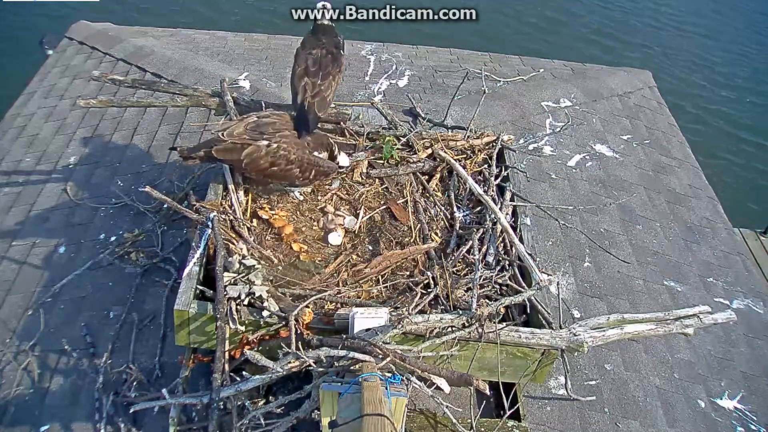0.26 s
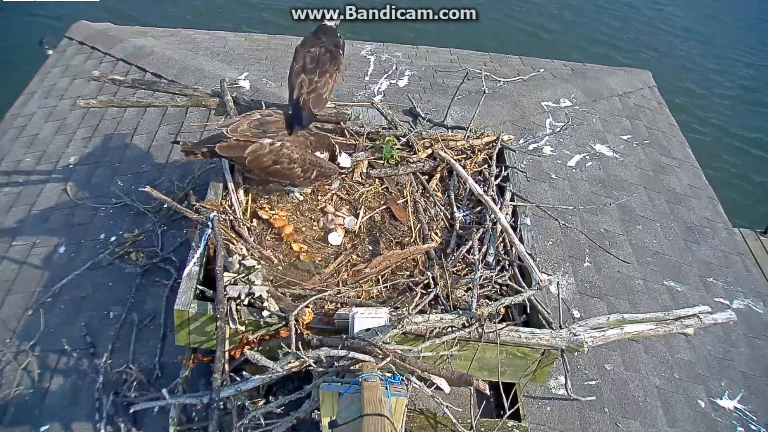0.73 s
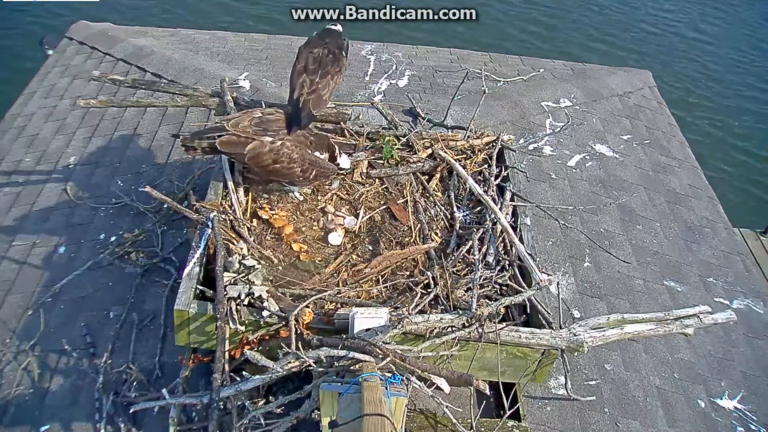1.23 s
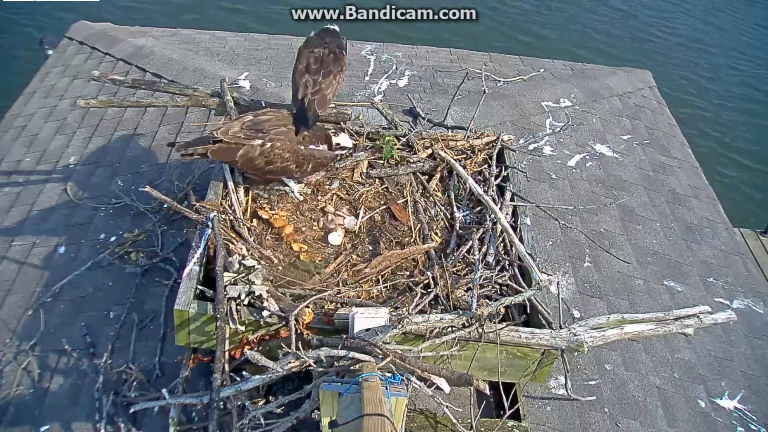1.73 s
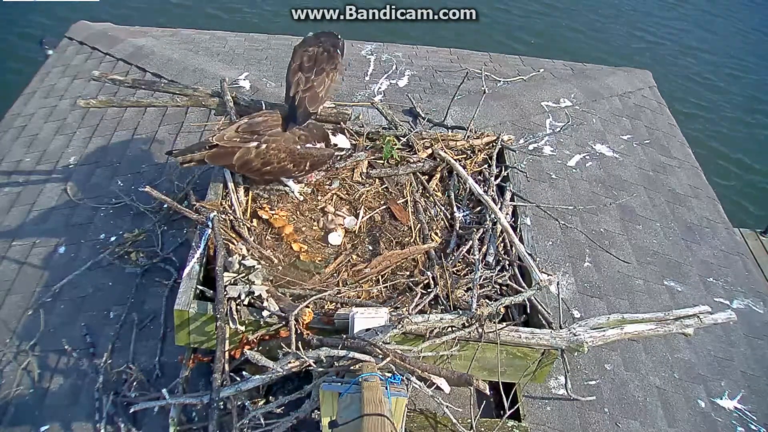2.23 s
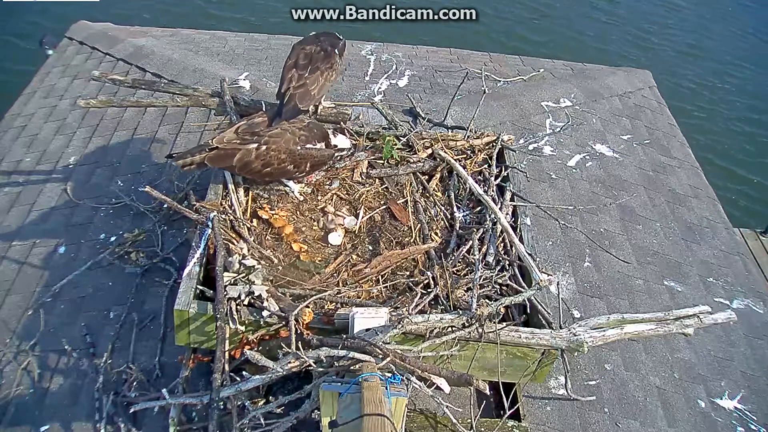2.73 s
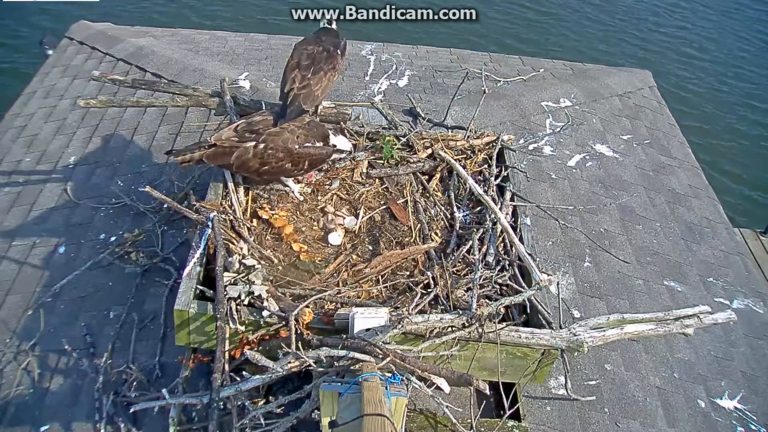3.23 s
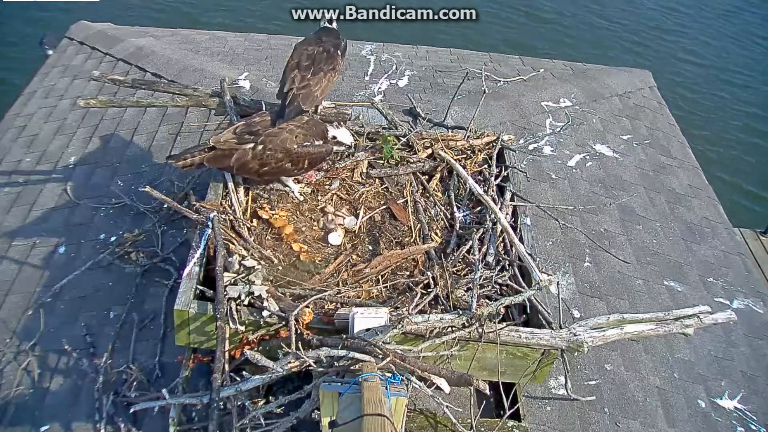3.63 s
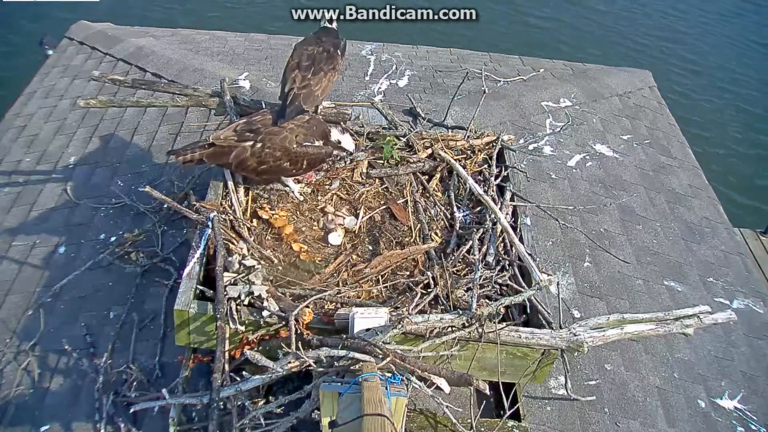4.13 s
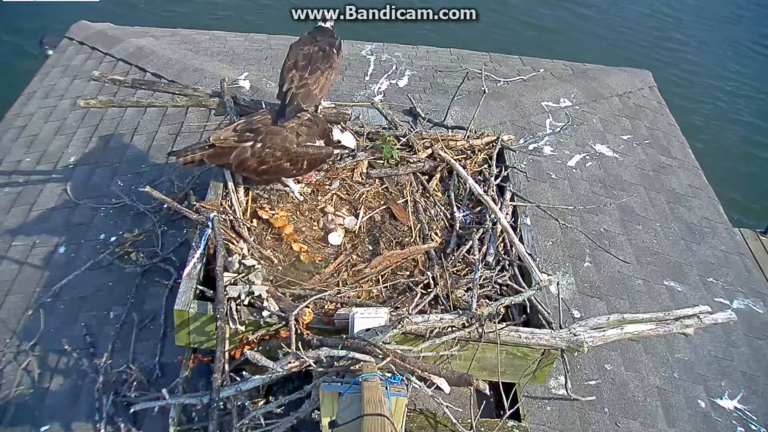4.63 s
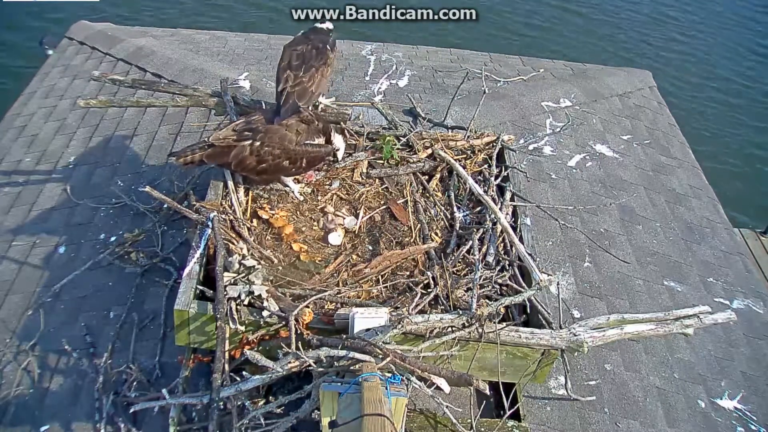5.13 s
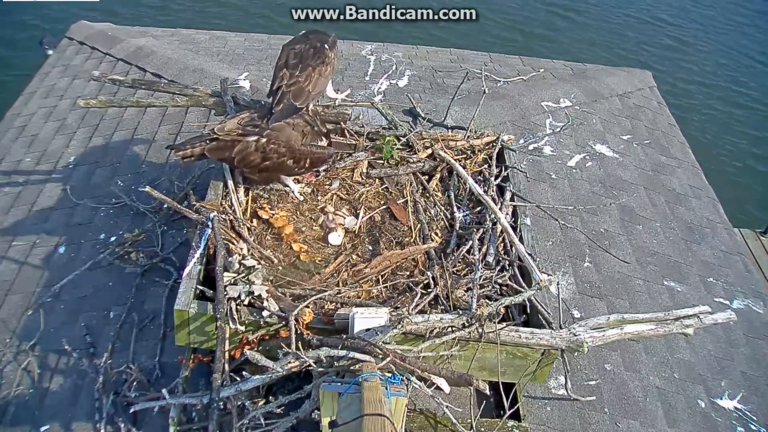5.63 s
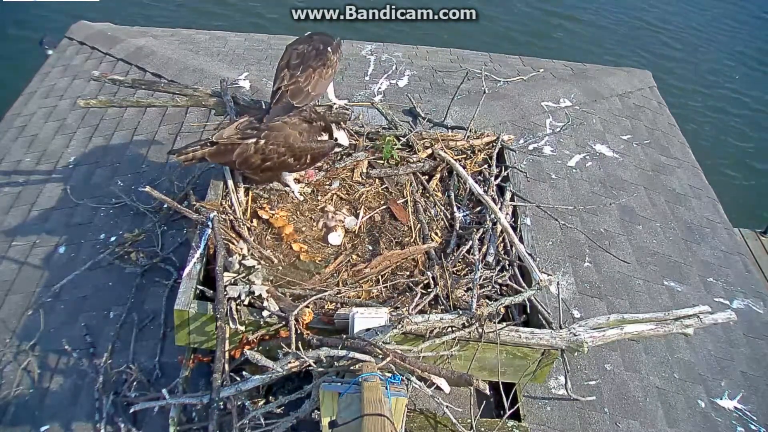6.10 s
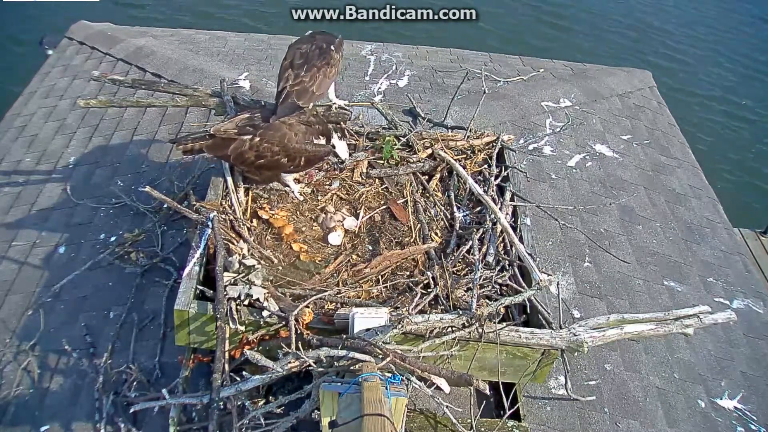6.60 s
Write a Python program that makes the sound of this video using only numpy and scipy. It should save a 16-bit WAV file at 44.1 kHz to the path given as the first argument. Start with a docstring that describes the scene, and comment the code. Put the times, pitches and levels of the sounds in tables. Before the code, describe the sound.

Osprey chicks peep thinly over wind rumbling on the microphone, then an adult gives one loud, ringing chirp.

```python
"""Osprey nest on a waterside roof

Through a small outdoor camera microphone, chicks beg in thin arching peeps that break off in
plunging chips, while twigs tick under the birds' feet. A far songbird whistles a few notes, and
an adult osprey squeaks softly and gives one loud chirp that rings in its throat.
Gusts rumble on the microphone over a low hum, hiss and a faint electronic whine."""
import sys
import numpy as np
from scipy import signal
from scipy.fft import rfft, irfft
from scipy.io import wavfile
from scipy.ndimage import uniform_filter1d

SR = 44100
rng = np.random.default_rng(int(sys.argv[2]) if len(sys.argv) > 2 else 0)


def materialize(psi):
    """Save the field psi as 16-bit PCM at rate SR to the path in sys.argv[1].

    A 1-D psi becomes a single channel; in a 2-D psi each row is a channel.
    """
    bounded = np.clip(np.atleast_2d(psi).T, -1, 1)
    quanta = np.round(bounded * 32767).astype(np.int16)
    wavfile.write(sys.argv[1], SR, quanta)


N = 302495
T = np.arange(N) / SR

# A chick begs about four times a second: an arch of pitch that breaks off in a chip. (break time [s],
# arch top [Hz], break pitch [Hz], arch level [dB], chip drive [dB], open-beak overtones [dB])
BEGGING = [(0.222, 3850, 2820, -48, -56.5, -4), (0.476, 4130, 2964, -48, -46.5, -1),
           (0.712, 3950, 3120, -47, -44, -8), (0.942, 4080, 3690, -56, -42, -8),
           (1.202, 4950, 3847, -68, -41, -14), (1.481, 5450, 4130, -70, -44.5, 0),
           (1.735, 5200, 4120, -64, -41, -0.5), (1.990, 4470, 3915, -61.5, -41.5, -1),
           (2.244, 4600, 4080, -65, -43, 0.5), (2.493, 5500, 3690, -83, -50, -2),
           (2.731, 5500, 3710, -76, -53, -6), (3.268, 4900, 3540, -61, -50, -12),
           (3.521, 5300, 3360, -64, -51, -3), (3.786, 4500, 3530, -66, -64, 0),
           (4.071, 5600, 4130, -65.5, -43.5, -0.5), (4.336, 5500, 3730, -76, -40, -3),
           (4.622, 3780, 2930, -55.5, -49.5, -8), (4.943, 3800, 3040, -52.5, -52, -24)]


def from_db(db):
    """Decibels to gain."""
    return 10 ** (np.asarray(db) / 20)


def rms_one(x):
    """Scale to unit rms."""
    return x / np.sqrt(np.mean(x ** 2) + 1e-20)


def in_time(rows):
    """Each column of a curve at every sample."""
    times, *columns = np.transpose(rows)
    return [np.interp(T, times, column) for column in columns]


def at_hz(spectrum, hz):
    """Gain of a spectrum at given frequencies."""
    points_hz, db = np.transpose(spectrum)
    return from_db(np.interp(np.log(np.maximum(hz, 1)), np.log(points_hz), db))


def noise(spectrum):
    """Unit noise of a given colour, falling away steeply past its ends."""
    hz = np.arange(N // 2 + 1) * SR / N + 1e-3
    roll_off = 1 / (1 + (hz / spectrum[-1][0]) ** 12) / (1 + (spectrum[0][0] / hz) ** 6)
    return rms_one(irfft(rfft(rng.standard_normal(N)) * at_hz(spectrum, hz) * roll_off, N))


def drift(rate_hz):
    """Random wander of unit rms, mostly slower than the given rate."""
    hz = np.arange(N // 2 + 1) * SR / N
    return rms_one(irfft(rfft(rng.standard_normal(N)) / (1 + (hz / rate_hz) ** 4), N))


def phase_of(hz):
    """Running phase of a pitch track."""
    return 2 * np.pi * np.cumsum(hz) / SR


def note(onset, length):
    """Sample indices of a note and its progress from 0 to 1."""
    at = np.arange(int(onset * SR), min(int((onset + length) * SR), N))
    return at, np.clip((at / SR - onset) / length, 0, 1)


def swell(progress, rise, fall):
    """Fade in and out over given shares of a note; between the fades a sine has rms 1."""
    fade_in = np.sin(np.pi / 2 * np.clip(progress / rise, 0, 1))
    fade_out = np.sin(np.pi / 2 * np.clip((1 - progress) / fall, 0, 1))
    return np.sqrt(2) * fade_in * fade_out


def background(drone_db=-47.5, hiss_trim_db=2, whine_trim_db=-1):
    """A bed of low outdoor drone, hiss and the faint whine of the camera's electronics."""
    # noise colours: (frequency [Hz], relative density [dB])
    drone_colour = [(20, -11), (38, -6.5), (60, 4), (90, -4), (125, -9), (170, -23), (215, -24), (270, -33),
                    (330, -26.5), (430, -30.5), (700, -35.5), (1200, -35)]
    hiss_colour = [(590, -29.5), (1000, -16.5), (1030, -24), (1320, -9), (1540, -9), (2050, -7), (2190, -7),
                   (3330, 1), (3620, -2), (4030, -6), (4730, -10), (5180, -10), (6710, -12.5), (7360, -21),
                   (9570, -49.5), (16200, -120)]
    # slight swell of the hiss: (time [s], level before trim [dB])
    hiss_curve = [(0.0, -63), (4.03, -62.5), (4.2, -62.5), (5.46, -62.5), (5.79, -60), (6.86, -63)]
    # electronic tones: (frequency [Hz], level before trim [dB])
    whine_tones = [(1050, -79), (1590, -78.5), (2100, -74.5), (4230, -77.5), (4518, -80.5), (5213, -80.5),
                   (5908, -80), (6603, -82.5)]
    drone = from_db(drone_db) * noise(drone_colour)
    hiss = from_db(in_time(hiss_curve)[0] + hiss_trim_db) * noise(hiss_colour)
    whine = sum(from_db(db + whine_trim_db) * np.sqrt(2) * np.sin(phase_of(hz + 2 * drift(40)))
                for hz, db in whine_tones)
    return drone + hiss + whine


def hum(hz=57.7, db=-46.0, wander=0.02, overtones_db=-13, slope_db=-4):
    """A low, unsteady hum, as of a far engine, with weak overtones that come and go."""
    phase = phase_of(hz * (1 + wander * drift(6.26)))
    out = np.sin(phase) * from_db(2 * drift(7.3))
    for k in range(2, 7):
        level = from_db(overtones_db + slope_db * k + 2 * drift(12))
        out += level * np.sin(k * phase + rng.uniform(0, 2 * np.pi))
    return np.sqrt(2) * from_db(db) * out


def wind_levels(rise_s=.015, fall_s=0.024, breeze_ref_db=-37):
    """Strength of buffeting and of turbulence in dB: the powers of breeze and gusts add up."""
    # breeze between the gusts: (time [s], strength [dB])
    breeze_curve = [(0.0, -40.5), (0.74, -30.5), (0.94, -37), (1.16, -41.5), (1.3, -38.5), (2.73, -61.5),
                    (3.02, -57.5), (3.82, -66.5), (4.3, -50.5), (4.81, -41), (5.25, -53), (5.88, -45.5),
                    (6.42, -26.5), (6.86, -35)]
    # gusts striking the microphone: (time [s], hold [s], buffeting [dB], turbulence before trim [dB])
    gusts = [(0.041, .08, -23.5, -32.5), (0.255, 0.069, -27, -38), (0.491, 0.018, -21, -42),
             (0.64, 0.077, -20, -32), (0.807, 0.024, -24.5, -34), (1.147, 0.069, -31, -44.5),
             (1.363, 0.1, -28, -54), (4.26, 0.094, -25.5, -50.5), (4.667, 0.11, -28, -52),
             (4.838, 0.034, -19, -34), (5.541, 0.022, -34.5, -39), (6.22, 0.082, -18, -31),
             (6.309, 0.072, -16, -26), (6.49, 0.092, -18, -25), (6.689, .16, -20, -31.5)]
    breeze_db = in_time(breeze_curve)[0] - breeze_ref_db
    buffet_power = from_db(-33 + 0.83 * breeze_db) ** 2
    turbulence_power = from_db(-44.5 + 1.56 * breeze_db) ** 2   # grows faster with the breeze
    for onset, hold, buffet_db, turbulence_db in gusts:
        envelope = np.exp(-np.maximum(onset - T, 0) / rise_s - np.maximum(T - onset - hold, 0) / fall_s)
        buffet_power += (from_db(buffet_db) * envelope) ** 2
        turbulence_power += (from_db(turbulence_db) * envelope) ** 2
    return 10 * np.log10(buffet_power), 10 * np.log10(turbulence_power)


def eddies(spectrum, evenness):
    """Low noise of fairly even strength, so that the gusts shape its swells."""
    rumble = noise(spectrum)
    power = uniform_filter1d(rumble ** 2, size=3000) + 1e-6
    return rms_one(rumble / power ** (evenness / 2))


def wind(flutter_trim_db=-1, rush_db=-37, strong_db=-25, steepness=2.01, rough_db=2.0):
    """Big eddies thump the microphone; gusts flutter above them, and only strong ones rush, raggedly."""
    # colours of the wind: (frequency [Hz], relative density [dB])
    buffet_colour = [(18, -7), (28, -4.5), (45, 5), (65, 0), (90, -8), (130, -21), (220, -41.5)]
    turbulence_colour = [(50, -6), (100, 10), (160, -4), (250, -17), (400, -36), (700, -60.5)]
    rush_colour = [(150, 8.5), (250, -0.5), (400, -8.5), (700, -20), (1200, -33), (2400, -41)]
    buffet_db, turbulence_db = wind_levels()
    thumps = from_db(buffet_db) * eddies(buffet_colour, evenness=0.96)
    flutter = from_db(turbulence_db + flutter_trim_db) * eddies(turbulence_colour, evenness=1.0)
    rush_level = from_db(rush_db + steepness * (turbulence_db - strong_db) + rough_db * drift(78))
    return thumps + flutter + rush_level * noise(rush_colour)


def arch(progress, start, top, end, apex):
    """Pitch that rounds up to its top at the apex, then falls ever faster."""
    climb = (top - start) * (1 - progress / apex) ** 2
    fall = (top - end) * ((progress - apex) / (1 - apex)) ** 2
    return top - np.where(progress < apex, climb, fall)


def chick_notes(begging_apex=0.24, edge_ratio=.86, twitters=6, twitter_s=0.09, twitter_db=-66.5):
    """The chicks' phrasing: begging arches, single peeps and faint random twittering."""
    # single, evenly arched peeps: (time [s], length [s], top pitch [Hz], level [dB])
    single_peeps = [(1.713, 0.027, 3420, -53.5), (2.643, 0.043, 2680, -66), (3.905, 0.051, 3860, -53),
                    (4.017, 0.016, 4550, -51.5), (4.271, 0.038, 3650, -57.5), (4.421, 0.034, 3860, -58),
                    (4.787, 0.02, 3590, -55.5), (4.842, 0.027, 3240, -57), (4.974, 0.037, 4870, -61.5),
                    (5.206, 0.045, 4350, -66), (6.051, .028, 3645, -43.5), (6.200, 0.022, 4050, -61),
                    (6.252, 0.024, 4300, -62), (6.358, .04, 3240, -45), (6.517, 0.029, 3490, -55.5),
                    (6.606, 0.025, 4250, -61), (6.692, 0.02, 4250, -64.5), (6.753, 0.031, 4270, -57.5)]
    notes = []
    for break_s, top, break_hz, db, _, _ in BEGGING:
        length = .029 * (top / 3940) ** 1.3   # higher arches last longer
        start = 3700 + .3 * (top - 3700)   # and set out a little higher
        notes.append((break_s - length, length, start, top, break_hz, begging_apex, db))
    twitter = [(rng.uniform(3.3, T[-1]), twitter_s, rng.uniform(3780, 4300), twitter_db)
               for _ in range(twitters)]
    for onset, length, top, db in single_peeps + twitter:
        notes.append((onset, length, edge_ratio * top, top, edge_ratio * top, .5, db))
    return notes


def peeps(overtone_db=-28, flutter_depth=2.13, clear_db=-52, range_db=9, jitter=.009, hoarse_jitter=.055):
    """Thin notes that arch up and down; weakly blown ones turn hoarse, shaking and breaking up."""
    out, shake, flutter = np.zeros(N), drift(530), drift(340)
    for onset, length, start, top, end, apex, db in chick_notes():
        at, progress = note(onset, length)
        hoarse = np.clip((clear_db - db) / range_db, 0, 1)
        pitch = arch(progress, start, top, end, apex)
        phase = phase_of(pitch * (1 + (jitter + hoarse_jitter * hoarse) * shake[at]))
        overtone = from_db(overtone_db) * (top < 3400) * np.sin(2 * phase)   # low notes only
        level = from_db(db + flutter_depth * (0.5 + 2 * hoarse) * flutter[at])
        out[at] += level * swell(progress, rise=0.28, fall=0.11) * (np.sin(phase) + overtone)
    return out


def chips(plunge_s=.015, end_hz=1480, jitter=0.0095, scratch=0.28):
    """As a chick's pitch plunges, the fundamental and then its overtones sweep the throat resonance."""
    # the chick's throat: (frequency [Hz], gain [dB])
    throat = [(1200, -10.5), (1900, -6.5), (2600, -14), (3300, 0.5), (3900, -1.5), (4700, -13.5),
              (5900, -12.5), (7200, -30.5)]
    out, waver = np.zeros(N), 1 + jitter * drift(750)
    air = scratch * noise(throat)
    for onset, _, start, _, db, open_db in BEGGING:
        at, progress = note(onset, plunge_s)
        pitch = (start + (end_hz - start) * progress ** 1.15) * waver[at]
        voice = sum(from_db(partial_db) * at_hz(throat, k * pitch) * np.sin(k * phase_of(pitch))
                    for k, partial_db in enumerate([0, open_db, open_db - 4.5], 1))
        out[at] += from_db(db) * swell(progress, rise=0.046, fall=0.15) * (voice + air[at])
    return out


def twigs(trim_db=-3, crack_s=0.001, crackles_per_s=7, crackle_db=-52, snap_db=6):
    """Each tick is a tiny splintering burst; thick twigs also ring low. Faint crackles come at random."""
    # ticks underfoot: (time [s], force before trim [dB], relative woody body [dB])
    ticks = [(0.427, -36.5, -3), (.838, -36.5, -24.5), (1.678, -38, -13), (1.702, -40, -6),
             (1.920, -49, -13), (2.028, -35, 7.5), (2.207, -41, -5), (2.957, -39, -12), (3.474, -37, -4),
             (3.743, -39, -8), (4.027, -37.5, -18), (4.292, -40.5, 0), (5.001, -34.5, -4), (6.046, -44, -4),
             (6.418, -29.5, 2), (6.48, -32.5, -5)]
    # ring of a dry twig: (frequency [Hz], gain [dB], t60 [s])
    modes = [(650, -12, 0.0034), (1250, -8.5, 0.0061), (1950, -14, 0.0036), (3270, -1.5, 0.017),
             (3970, 0.5, 0.0056), (4500, -9, 0.0043), (5840, -10, .004)]
    thin, thick, ring = np.zeros((3, N))
    for onset, db, body_db in ticks:
        at, _ = note(onset, .008)
        burst = rng.standard_normal(len(at)) * np.exp(-(at - at[0]) / SR / crack_s)
        burst = from_db(db + trim_db) * burst / np.linalg.norm(burst)
        thin[at] += burst
        thick[at] += from_db(body_db) * burst
    crackles = rng.random(N) < crackles_per_s / SR
    thin += crackles * from_db(crackle_db + 5 * rng.standard_normal(N))
    for k, (hz, db, t60) in enumerate(modes):
        decay, angle = from_db(-60 / (t60 * SR)), 2 * np.pi * hz / SR
        feedback = [1, -2 * decay * np.cos(angle), decay ** 2]
        force = thick if hz < 2400 else thin
        ring += (-1) ** k * from_db(db) * signal.lfilter([0, np.sin(angle)], feedback, force + 1e-18)
    snap = signal.sosfilt(signal.butter(2, 4000, "high", fs=SR, output="sos"), thin)   # the bare crack
    return ring + from_db(snap_db) * snap


def squeaks(jitter=0.029, overtone_db=-1):
    """A few weak, unsteady notes from the adult, most just after its chirp."""
    # soft glides: (time [s], length [s], start pitch [Hz], end pitch [Hz], level [dB])
    glides = [(2.938, 0.092, 1860, 2010, -69), (5.67, 0.006, 1980, 2050, -50.5),
              (5.725, 0.028, 1540, 1546, -56), (5.731, 0.019, 1970, 1970, -58),
              (5.738, 0.042, 2310, 1960, -55)]
    out, waver = np.zeros(N), 1 + jitter * drift(500)
    for onset, length, start, end, db in glides:
        at, progress = note(onset, length)
        phase = phase_of((start + (end - start) * progress ** 2) * waver[at])
        voice = np.sin(phase) + from_db(overtone_db) * np.sin(2 * phase)
        out[at] += from_db(db) * swell(progress, rise=0.38, fall=0.28) * voice
    return out


def songbird(jitter=0.0016):
    """Far, pure whistles of nearly level pitch."""
    # the phrase: (time [s], length [s], start pitch [Hz], end pitch [Hz], level [dB])
    whistles = [(4.149, 0.12, 2857, 2787, -46.5), (4.218, 0.055, 3160, 3250, -53),
                (4.407, 0.14, 2818, 2875, -45), (4.667, 0.143, 2820, 2875, -44.5),
                (4.925, 0.15, 2814, 2865, -44.5)]
    out, waver = np.zeros(N), 1 + jitter * drift(60)
    for onset, length, start, end, db in whistles:
        at, progress = note(onset, length)
        pitch = (start + (end - start) * progress) * waver[at]
        out[at] += from_db(db) * swell(progress, rise=0.54, fall=0.094) * np.sin(phase_of(pitch))
    return out


def adult_chirp(jitter=0.0047, rasp=0.019, brightening=0.31, full_db=-23, air_db=-25, opening_s=0.033):
    """One ringing chirp; overtones grow with effort and carry a slight rasp."""
    # the chirp's contour: (time [s], pitch [Hz], drive [dB])
    contour = [(5.555, 2350, -57), (5.562, 2143, -38), (5.571, 2045, -29.5), (5.580, 1998, -25.5),
               (5.592, 2024, -24), (5.607, 2018, -20), (5.622, 1937, -22.5), (5.638, 1840, -23),
               (5.650, 1704, -31), (5.656, 1500, -49)]
    # the adult's throat: (frequency [Hz], gain [dB])
    throat = [(1500, -4), (1850, -5.5), (2030, -2), (2400, -7), (3300, -0.5), (3700, 0), (4050, -4.5),
              (4500, -18), (5400, -23.5), (5800, -19.5), (6200, -32.5), (7500, -31)]
    # air hissing between the harmonics: (frequency [Hz], relative density [dB])
    air_colour = [(1500, -8), (2400, -7.5), (3500, 16), (4300, -13.5), (5000, 6.5), (6800, -11)]
    onset, end = contour[0][0], contour[-1][0]
    pitch, db = in_time(contour)
    pitch *= 1 + jitter * drift(750)
    phase = phase_of(pitch)
    beak_opening = np.clip((T - onset) / opening_s, 0, 1) ** 2
    effort = from_db(brightening * np.minimum(db - full_db, 0)) * beak_opening
    voice = at_hz(throat, pitch) * np.sin(phase) * (1 + 0.012 * drift(410))
    for k in (2, 3):
        roughness = 1 + rasp * (k - 1) ** 2 * drift(550)
        voice += effort * at_hz(throat, k * pitch) * np.sin(k * phase) * roughness
    air = from_db(air_db + (db + full_db) / 2) * noise(air_colour)
    sounding = (T > onset) & (T < end)
    return sounding * (np.sqrt(2) * from_db(db) * voice + air)


def roof(direct, scatter_db=-22, t60=0.15):
    """Sticks and shingles scatter a faint, short tail."""
    t = np.arange(SR // 3) / SR
    tail = rng.standard_normal(len(t)) * from_db(-60 * t / t60) * (t > .003)
    return direct + from_db(scatter_db) * signal.fftconvolve(direct, tail / np.linalg.norm(tail))[:N]


def scene():
    """The nest, the far songbird, wind, hum and background in one channel."""
    nest = roof(peeps() + chips() + adult_chirp() + squeaks() + twigs())
    return (nest + songbird() + wind() + hum() + background())[None]


def record(dry, cutoff_hz=7350, offset=-0.0114):
    """The camera cuts the upper treble steeply, and its converter adds a constant offset."""
    return signal.sosfilt(signal.ellip(10, .2, 70, cutoff_hz, fs=SR, output="sos"), dry) + offset


dry = scene()
out = record(dry)
materialize(out)
```